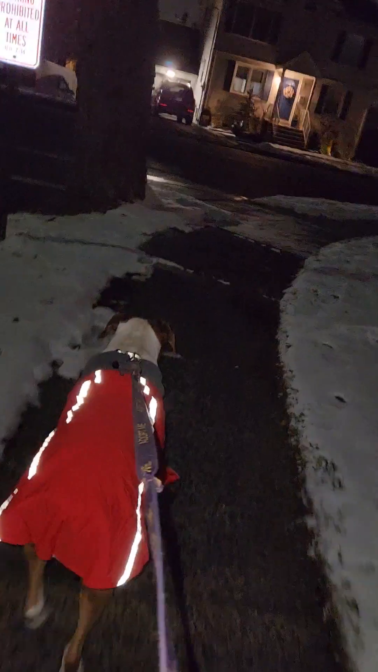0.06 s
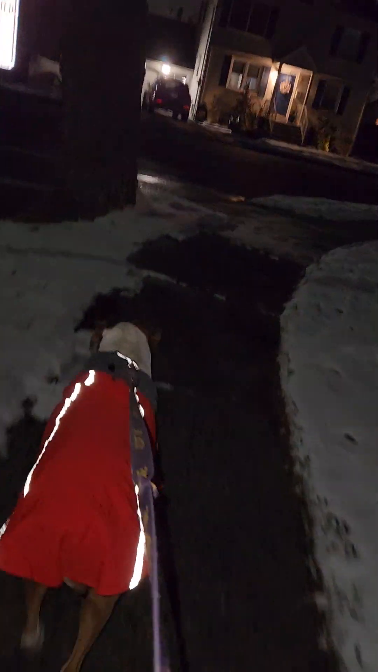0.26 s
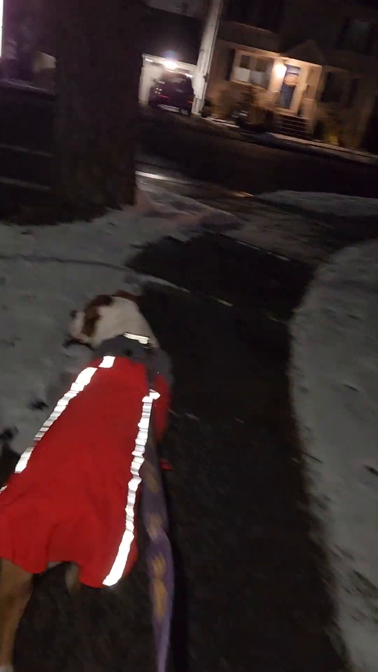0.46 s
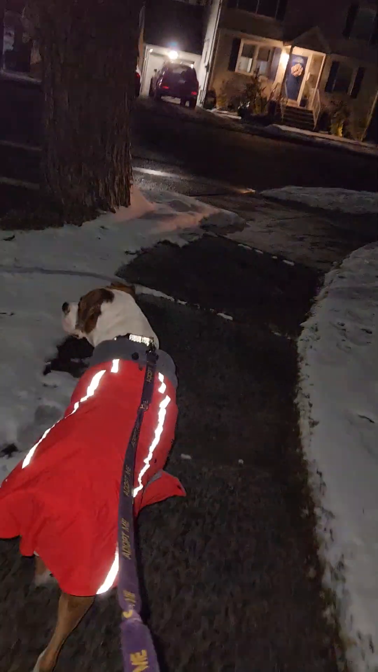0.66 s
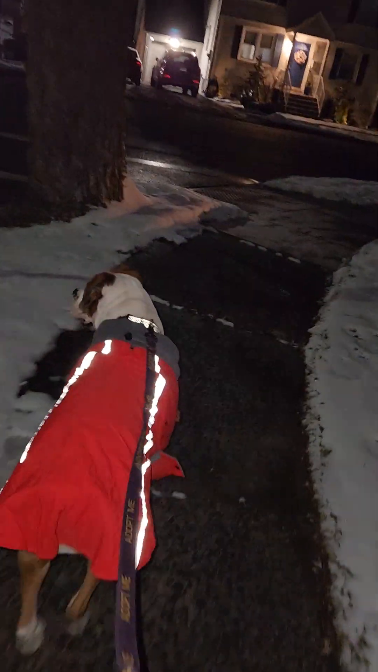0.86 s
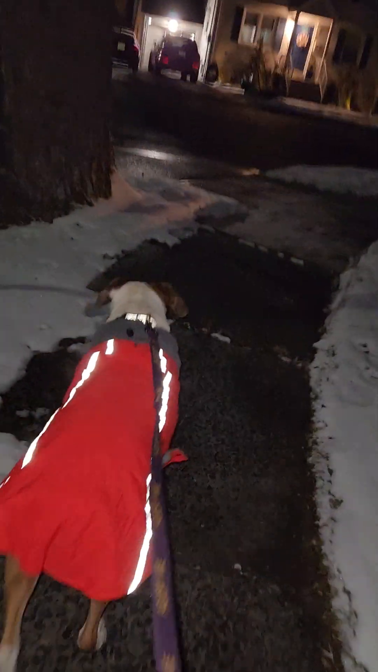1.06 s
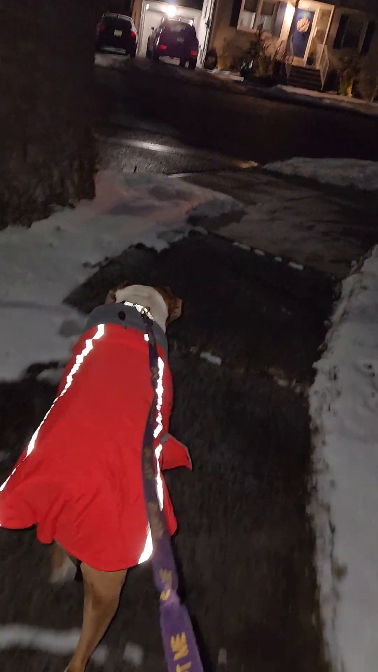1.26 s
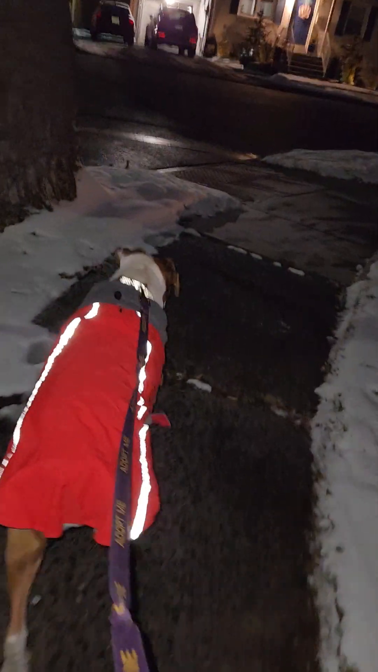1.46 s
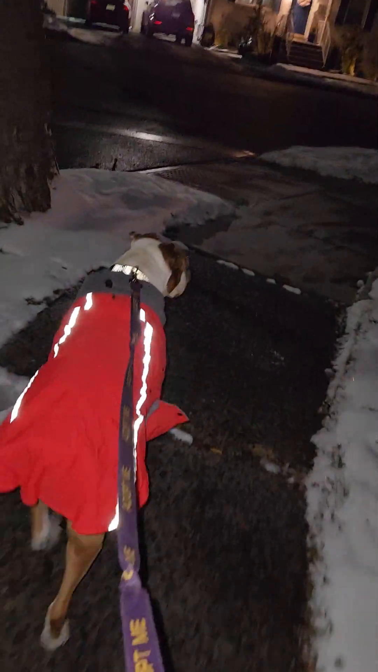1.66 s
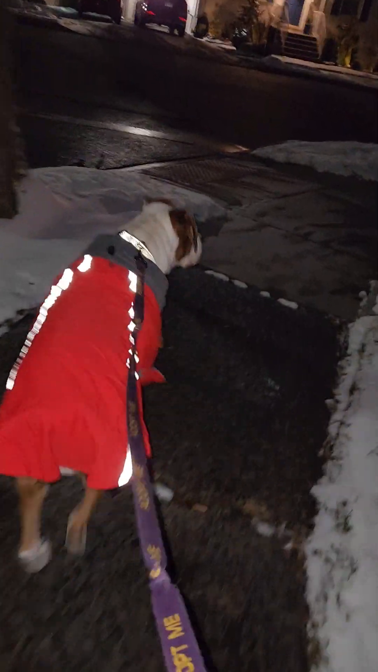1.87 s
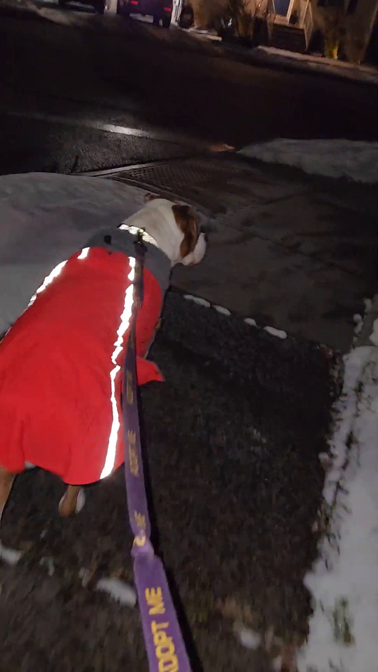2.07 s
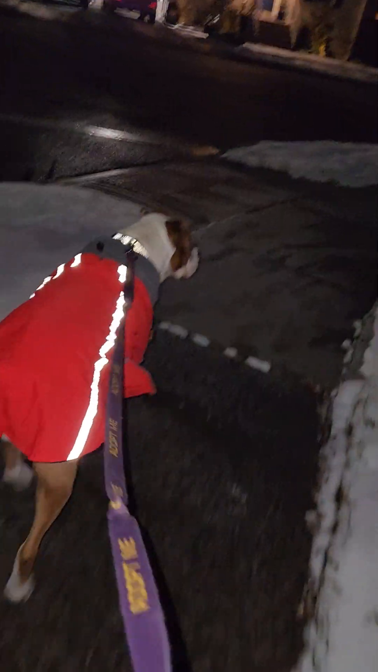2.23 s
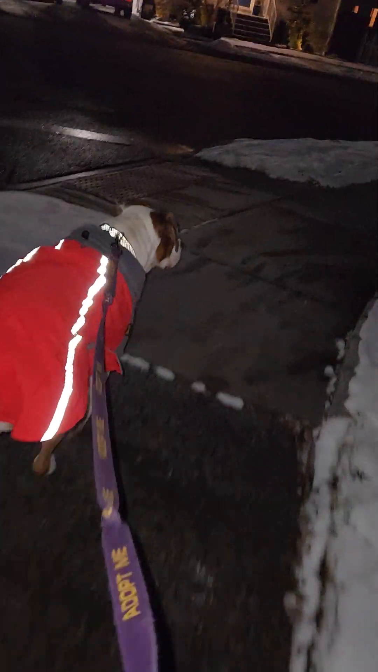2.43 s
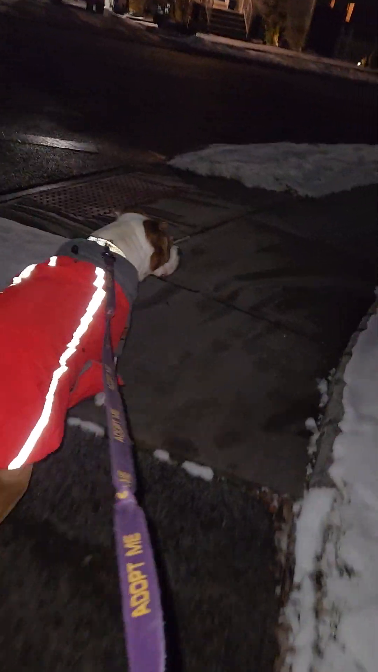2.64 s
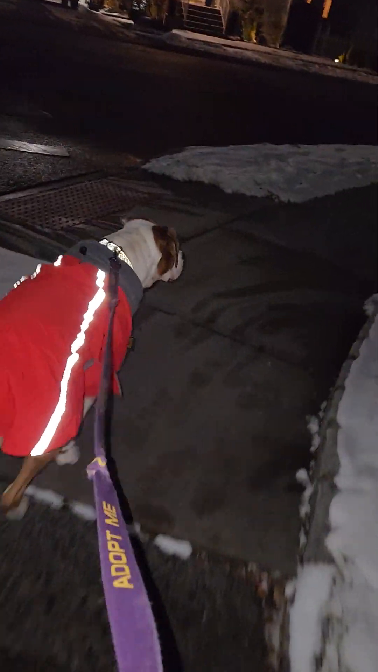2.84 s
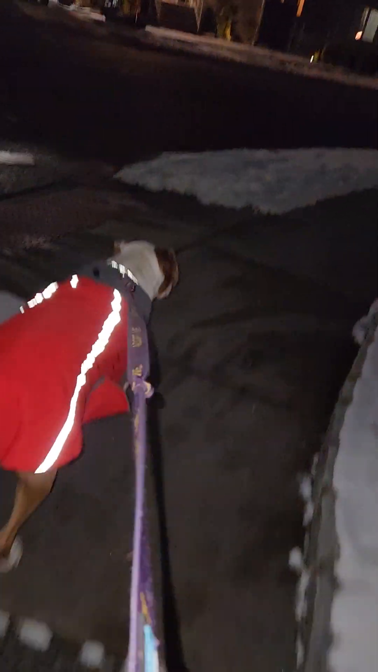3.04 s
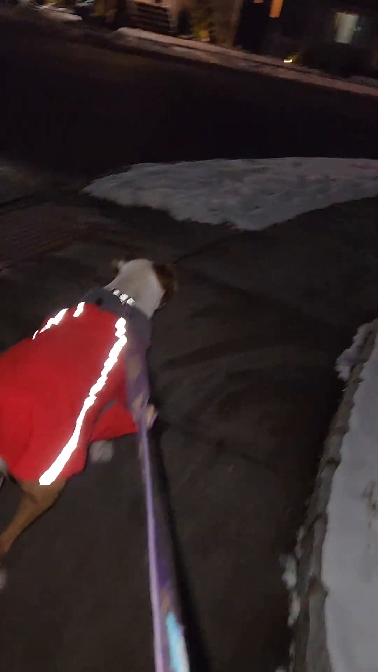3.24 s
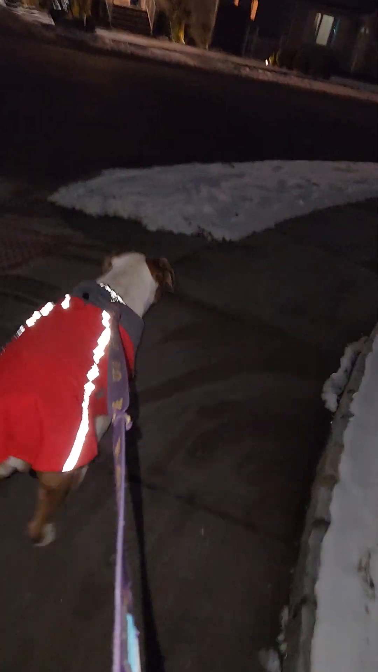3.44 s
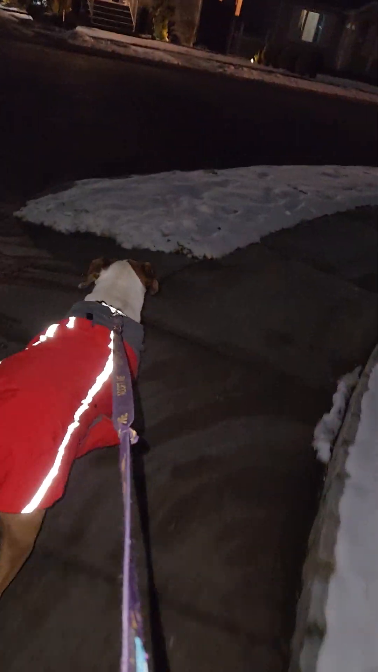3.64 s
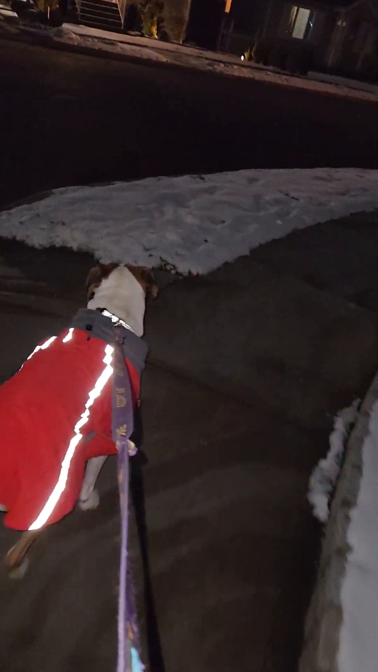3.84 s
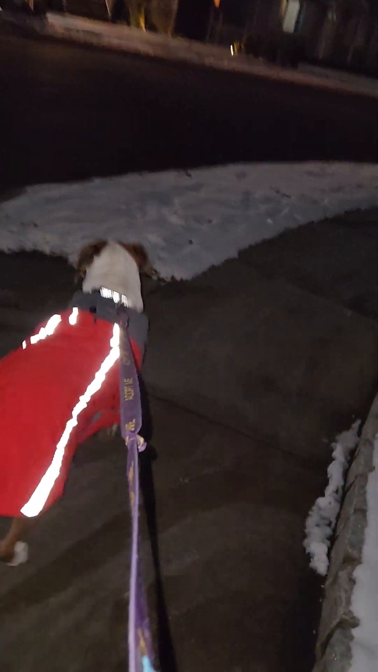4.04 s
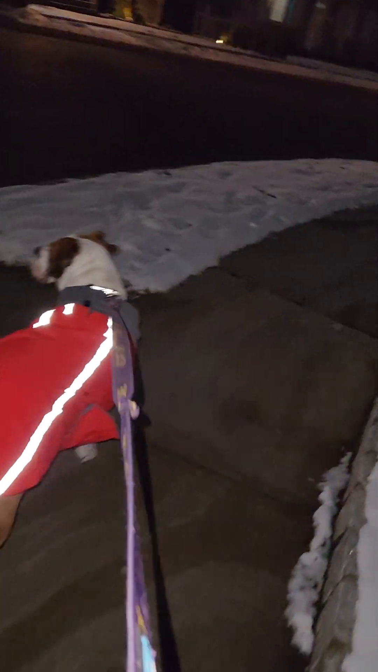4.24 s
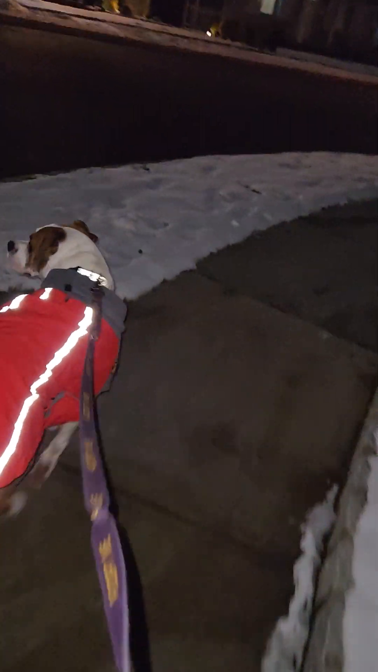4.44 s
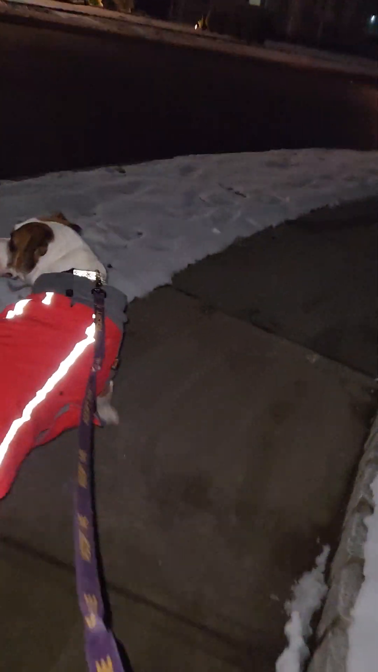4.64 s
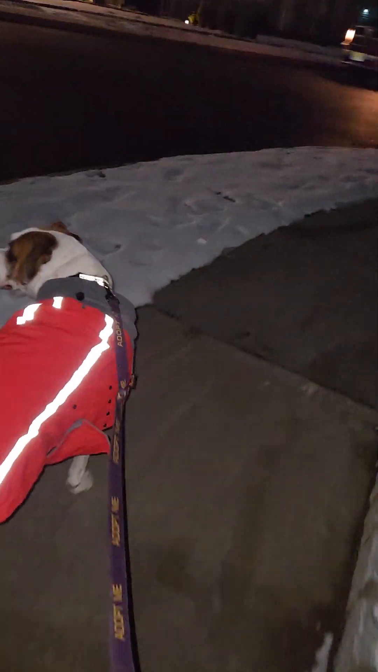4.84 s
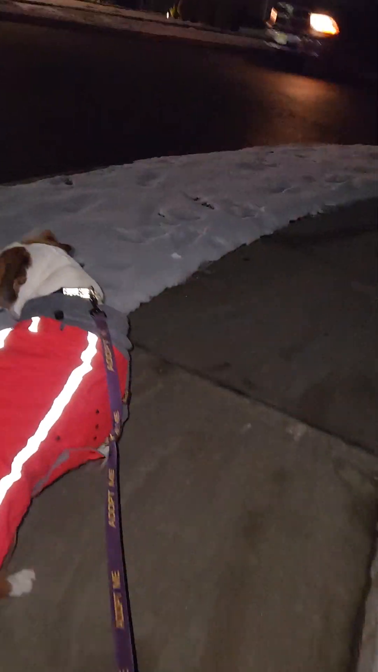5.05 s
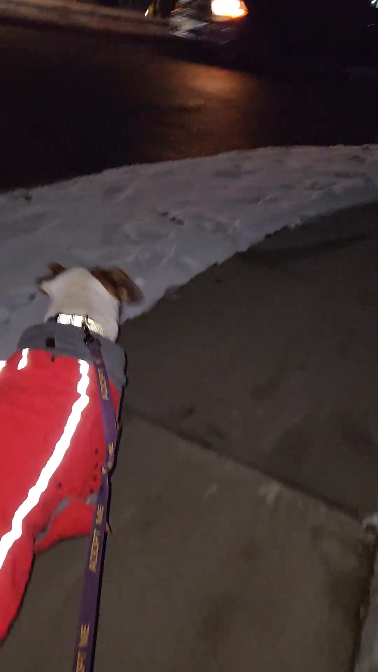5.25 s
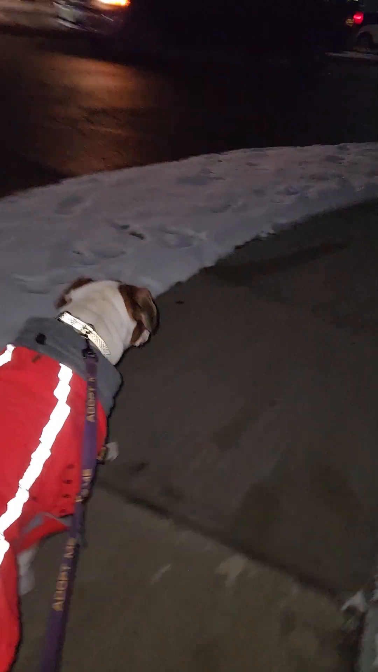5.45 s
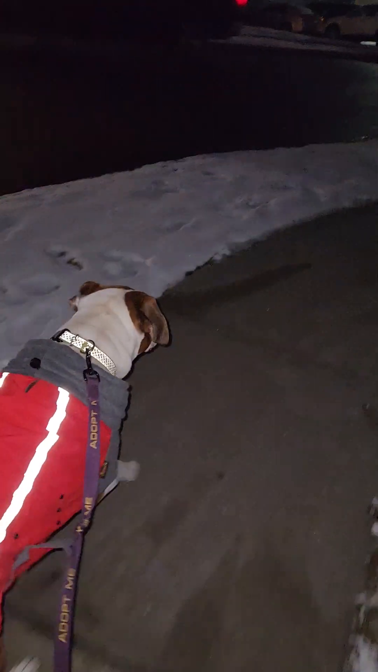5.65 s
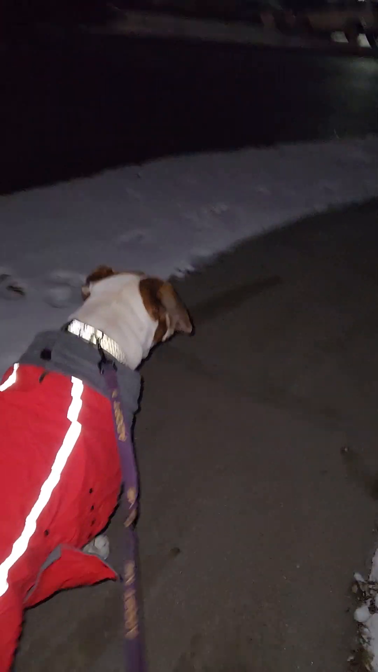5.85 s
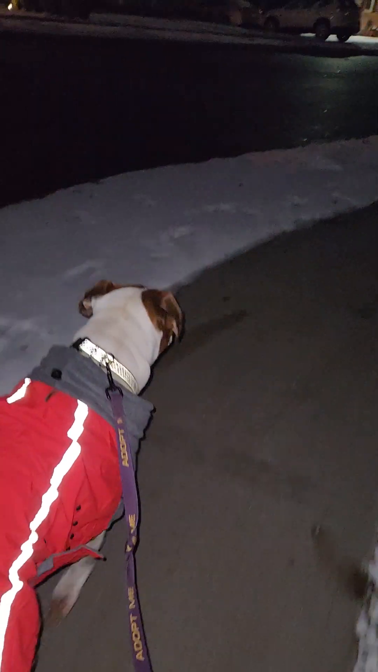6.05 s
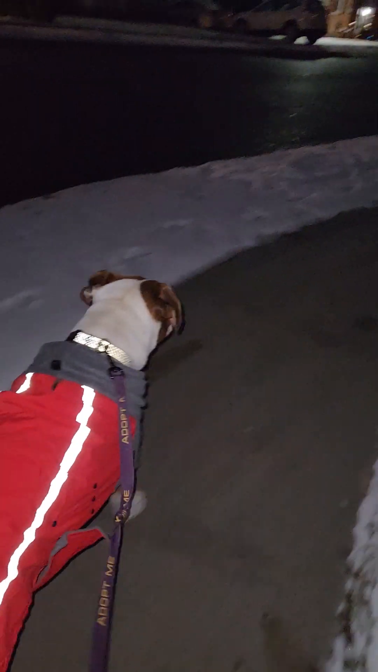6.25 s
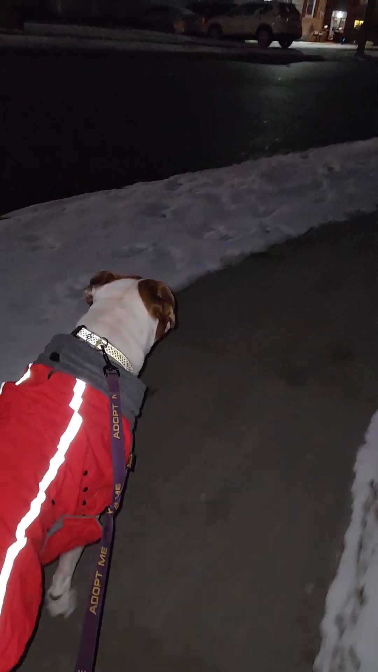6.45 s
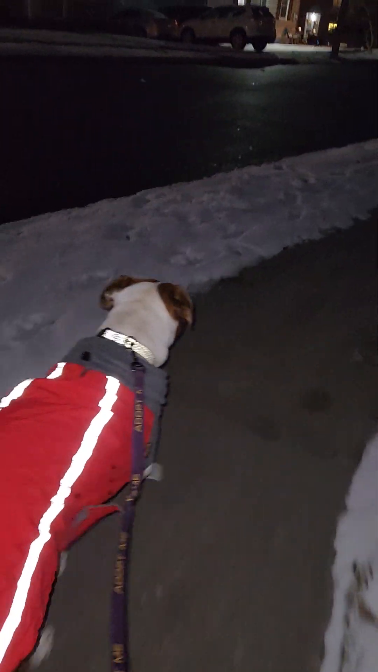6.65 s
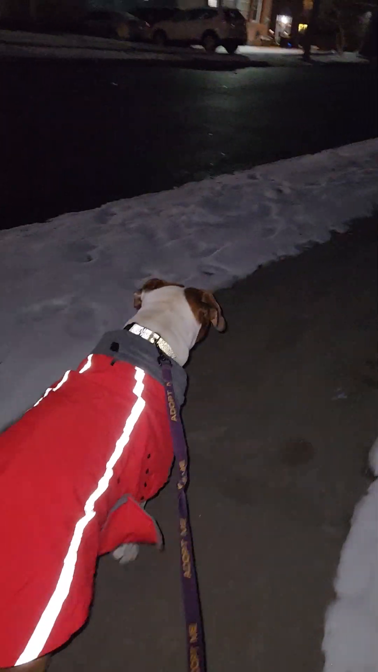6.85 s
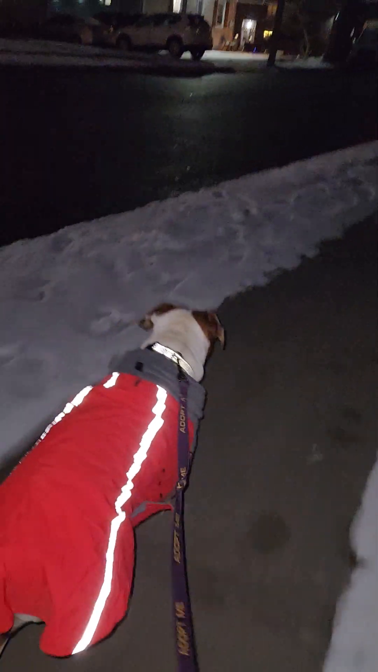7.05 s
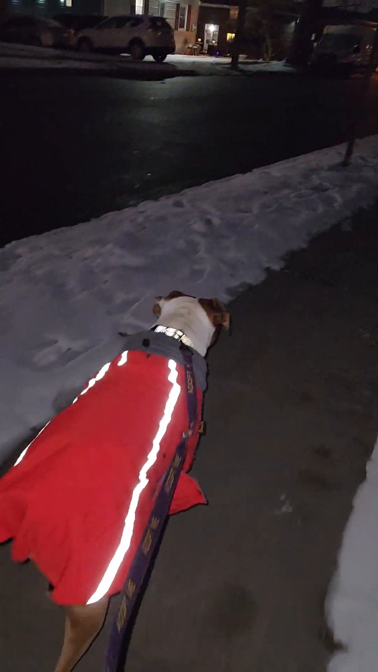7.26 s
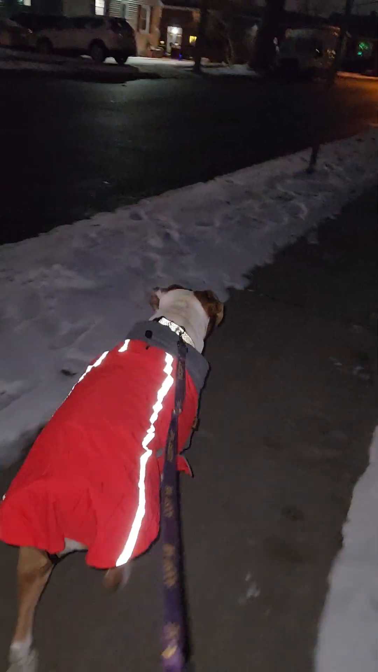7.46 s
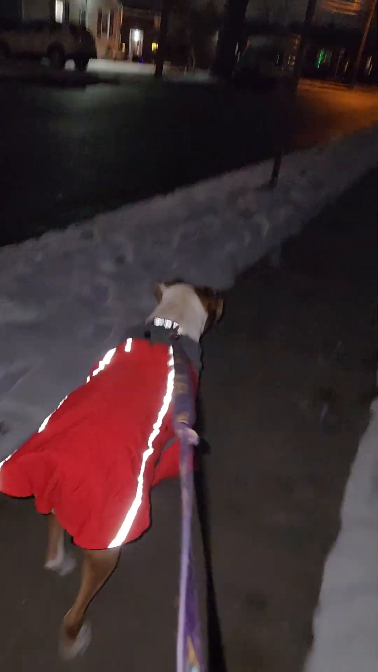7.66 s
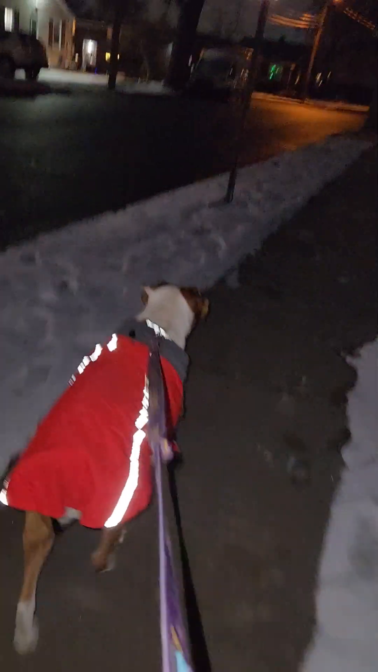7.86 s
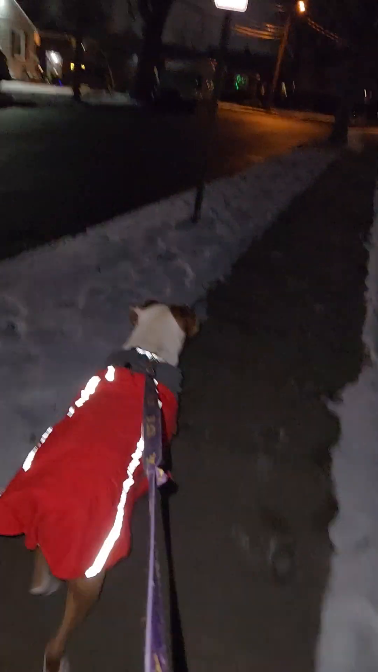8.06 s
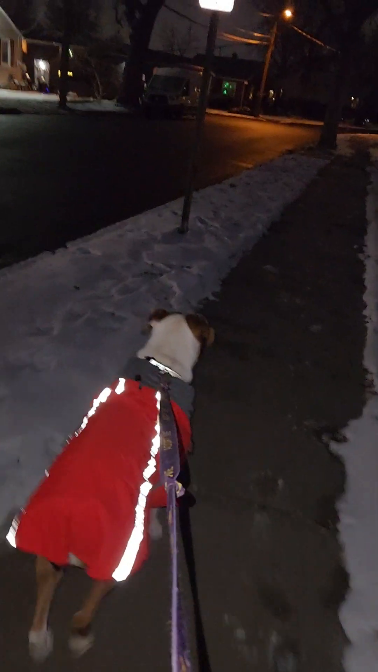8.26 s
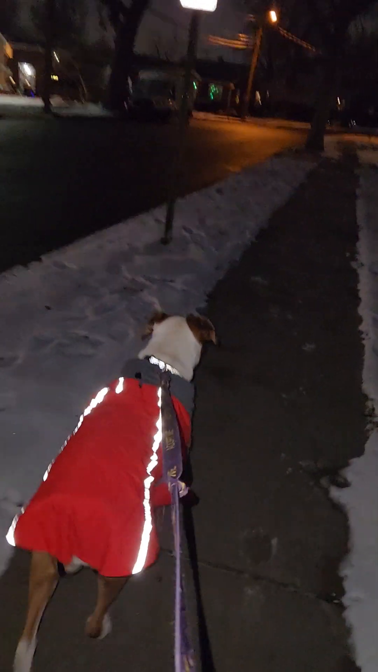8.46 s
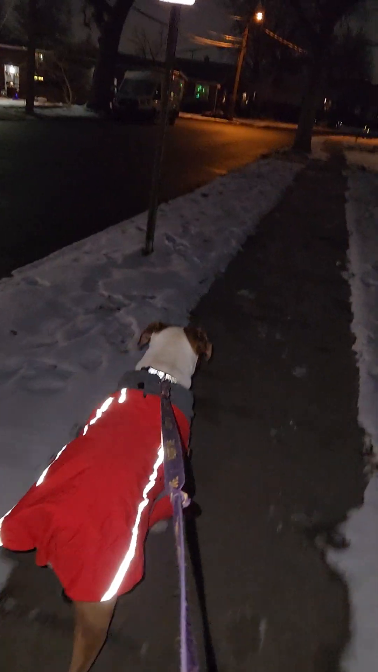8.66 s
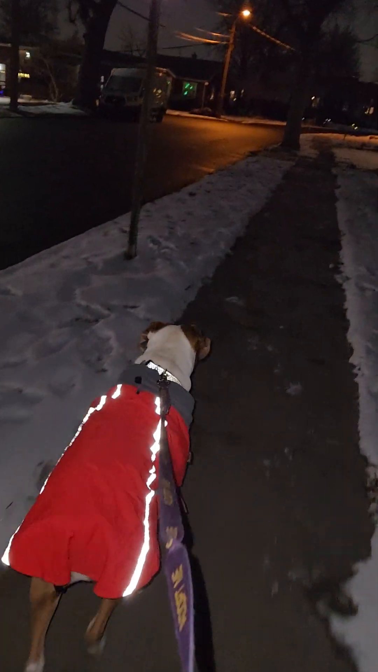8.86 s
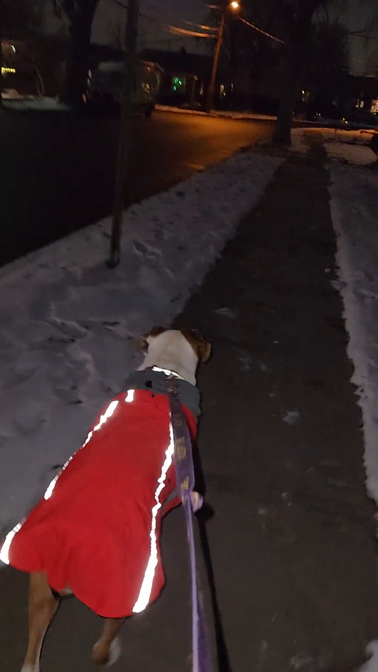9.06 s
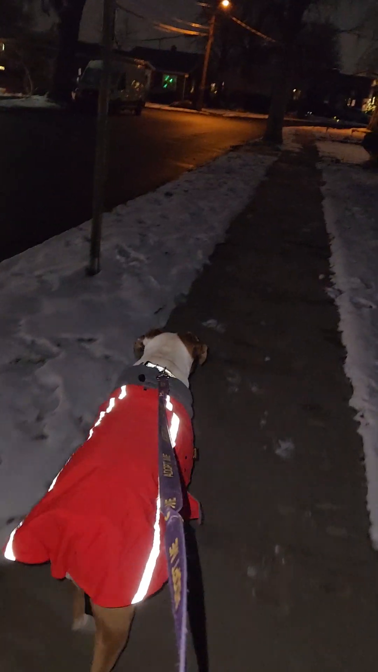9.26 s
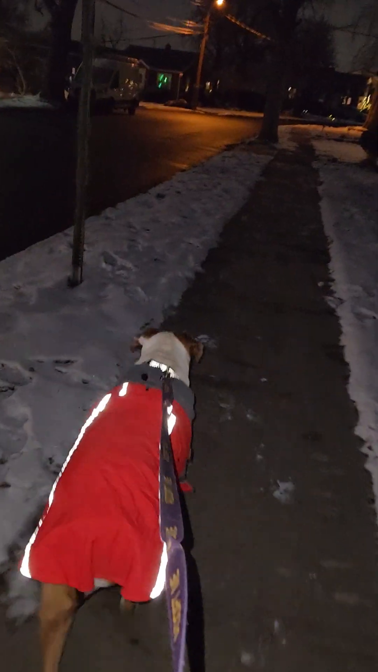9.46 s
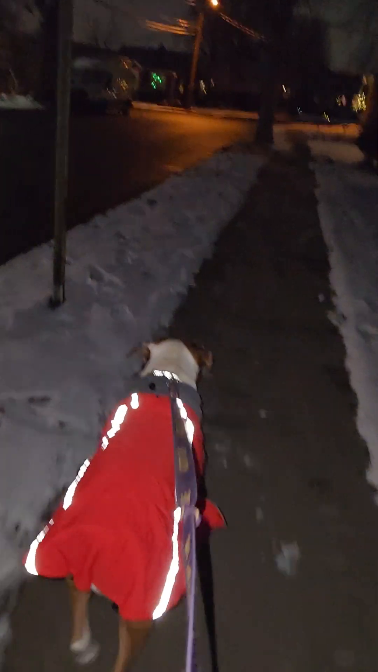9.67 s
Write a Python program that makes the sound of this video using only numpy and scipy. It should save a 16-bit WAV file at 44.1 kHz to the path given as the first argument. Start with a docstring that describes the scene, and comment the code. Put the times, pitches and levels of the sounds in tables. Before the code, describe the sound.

Low town hum and soft wind buffeting surround someone walking a dog. Fabric rustles close on the left, leash hardware clicks and grit crunches. An engine approaches with a deep, wavering boom, rises, shifts lower, and passes around the middle with rasping exhaust and hissing wet tyres. It recedes, hoots briefly and slows at the end.

```python
"""From the first seconds, walkers with a dog move along a night street: cloth rustles, leash hardware ticks, grit crunches.
A V8 vehicle winds up through town noise, drops in pitch near 3 s and cruises, summed from lines at engine orders.
It is closest near 5.4 s: the exhaust burbles and rasps, and tyres hiss on the wet road as coloured noise.
From 8.8 s the deep boom sinks, the pipe hoots briefly near 9.1 s and the engine slows to the end."""
import sys
import numpy as np
from scipy import signal
from scipy.fft import rfft, irfft, next_fast_len
from scipy.io import wavfile

SR = 44100
rng = np.random.default_rng(int(sys.argv[2]) if len(sys.argv) > 2 else 0)


def pcm_store(signal):
    """Save signal as 16-bit PCM."""
    levels = np.round(np.clip(np.atleast_2d(signal), -1, 1) * 32767)
    wavfile.write(sys.argv[1], SR, levels.astype(np.int16).T)


N = 427851
TIME = np.arange(N) / SR


def gain_of(db):
    """Decibels to amplitude."""
    return 10 ** (np.asarray(db) / 20)


def evened(x):
    """Scales to rms 1."""
    return x / np.sqrt(np.mean(x ** 2) + 1e-20)


def curves(rows):
    """Draws each column after the time column as an automation curve, one value per sample."""
    s, *columns = np.transpose(rows)
    return [np.interp(TIME, s, c) for c in columns]


def read(points, hz):
    """Reads a spectrum, joined by straight lines over log frequency."""
    f, value = np.transpose(points)
    return np.interp(np.log(hz + 1), np.log(f + 1), value)


def add(mix, s, sound):
    """Mixes a stereo sound in at time s."""
    part = mix[:, max(round(s * SR), 0):][:, :sound.shape[-1]]
    part += sound[..., :part.shape[-1]]


def wander(rate, size=4096):
    """Smooth random modulation of rms 1, rolled off above rate [Hz]."""
    hz = np.fft.rfftfreq(size, TIME[-1] / size)
    slow = irfft(rfft(rng.standard_normal(size)) / (1 + (hz / rate) ** 4))
    return np.interp(TIME, np.linspace(0, TIME[-1], size), evened(slow))


# how alike the two channels are: (frequency [Hz], coherence [0-1])
CHANNEL_COHERENCE = [(30, 0.52), (200, 0.99), (500, 0.85), (1000, 0.81), (2000, 0.33), (4000, 0.17),
                     (8000, .1), (12000, .02)]


def noise(spectrum, grain_db=0):
    """Stereo noise of rms 1, its channels most alike in the low mids; grain_db makes it crackle."""
    size = next_fast_len(N)
    hz = np.fft.rfftfreq(size, 1 / SR)
    # every 32 samples draw a new random level
    grain_level = np.minimum(rng.exponential(1, size // 32 + 1), 5)
    grains = gain_of(grain_db * grain_level).repeat(32)[:size]
    a, b = rfft(rng.standard_normal((2, size)) * grains)
    same = np.clip(read(CHANNEL_COHERENCE, hz), 0, 1)
    pair = np.array([a, same * a + np.sqrt(1 - same ** 2) * b])
    return evened(irfft(pair * gain_of(read(spectrum, hz)), size)[:, :N])


def band(x, hz, octaves):
    """A gentle band-pass around hz."""
    edges = np.clip([hz / 2 ** (octaves / 2), hz * 2 ** (octaves / 2)], 20, SR / 2 - 200)
    return signal.sosfilt(signal.butter(2, edges, "band", fs=SR, output="sos"), x)


def panned(x, balance_db):
    """Splits a left-right level difference between the channels."""
    return x * gain_of(np.array([[.5], [-.5]]) * balance_db)


# colour of the distant town: (frequency [Hz], level [dB per Hz])
STREET_COLOUR = [(20, -16.5), (45, -1.5), (85, 7.5), (150, 6.5), (300, -11.5), (500, -17.5), (850, -15),
                 (1400, -17), (2700, -30), (5000, -31), (6200, -54.5), (7500, -31), (10000, -61),
                 (15500, -58)]
# air on the microphone: (time [s], level before gusts [dB])
BUFFET_LEVEL = [(0, -48.5), (2.7, -36), (3.3, -29.5), (4.6, -41.5), (7.4, -46.5), (8.8, -32.5),
                (9.7, -34.5)]
# colour of the buffeting: (frequency [Hz], level [dB per Hz])
BUFFET_COLOUR = [(10, -14), (25, -5), (46, 0), (60, -2), (110, -18), (300, -50), (900, -90)]


def street(hum_db=-41, buffet_db=0.0, gust_db=5.5):
    """Distant town noise holds steady; air buffets the microphone as low noise with gusty level."""
    gusts_db = gust_db * wander(rate=4)
    buffet_gain = gain_of(curves(BUFFET_LEVEL)[0] + buffet_db + gusts_db)
    return gain_of(hum_db) * noise(STREET_COLOUR) + buffet_gain * noise(BUFFET_COLOUR)


# steady rustle of walking: (time [s], level before trim [dB])
RUSTLE_LEVEL = [(0, -74), (3.2, -68), (5.2, -61.5), (6.6, -60.5), (7.1, -69.5), (8.2, -76), (9.7, -73)]
# single rubs of cloth: (start [s], length [s], level before trim [dB], left-right difference [dB])
CLOTH_RUBS = [(.37, 0.18, -55, 0), (1.3, 0.37, -62, 3), (1.876, 0.11, -58, 4), (2.373, 0.14, -58.5, 3),
              (2.82, 0.35, -68, 7), (3.354, 0.39, -56, 4), (3.86, 0.18, -58, 3), (4.34, 0.18, -57.5, 0),
              (4.796, 0.13, -52.5, 4), (4.94, .14, -59, 11), (5.267, 0.2, -59, 15), (5.732, 0.1, -39.5, -1),
              (5.917, 0.055, -58, 8), (6.133, 0.41, -62, 12), (6.79, 0.087, -61, 8), (7.35, 1, -66.5, 6),
              (9.27, 0.17, -59, -2)]
# colour of the fabric: (frequency [Hz], level [dB per Hz])
CLOTH_COLOUR = [(400, -21.5), (1500, -0.5), (2400, 9.5), (4000, 2.5), (7600, 1), (10000, -7), (11200, -6.5),
                (12500, -2), (14000, -5), (15800, -1)]
RUB_RISE, RUB_HOLD = 0.2, 0.43  # shares of a rub's length at which it is full and starts to die


def cloth(rustle_db=5.5, rub_db=7.0, uneven_db=3.0, catch_db=2.5):
    """Fabric rustles unevenly on the left; each rub swells, catches as it slides and dies away."""
    rustle_level = curves(RUSTLE_LEVEL)[0] + rustle_db + uneven_db * wander(rate=8.1)
    rustle = panned(gain_of(rustle_level), balance_db=14.0)
    rubs = np.zeros((2, N))
    for s, length, db, balance_db in CLOTH_RUBS:
        shape = np.interp(np.linspace(0, 1, round(length * SR)), [0, RUB_RISE, RUB_HOLD, 1], [0, 1, 1, 0])
        add(rubs, s, panned(gain_of(db + rub_db) * shape, balance_db))
    catching = rubs * gain_of(catch_db * wander(rate=52))
    return np.hypot(rustle, catching) * noise(CLOTH_COLOUR, grain_db=1.5)


def burst(hz, octaves, t60, snap=6, size=6000):
    """A sharp snap and a dying puff of noise in one band, peak 1."""
    t = np.arange(size) / SR
    common, left, right = rng.standard_normal((3, size))
    drive = (common + .5 * np.array([left, right])) * gain_of(-60 * t / t60) + snap * (t == 0)
    puff = band(drive, hz, octaves)
    return puff / abs(puff).max()


# leash hardware: (time [s], peak before panning [dB], centre [Hz], width [octaves], t60 [s],
# left-right difference [dB])
LEASH_TICKS = [(0.36, -41, 7300, 1.1, .03, -10), (.469, -36, 7000, 1.1, .02, -6),
               (1.305, -40, 6650, .6, .03, 8), (1.577, -38, 9000, 1.5, .012, 15),
               (1.791, -45, 7000, 0.48, .017, 6), (2.581, -36, 9500, 1.3, .02, 9),
               (3.959, -38, 7300, 1.3, .025, 3), (4.094, -41, 5970, .6, .02, 7),
               (4.352, -31, 12100, 0.034, .025, -7), (8.053, -38, 3300, 0.43, 0.028, 7),
               (8.37, -45, 6860, .66, 0.13, -6), (9.487, -38, 4700, 1, .038, 6)]
# grit and ice under shoes and paws: (time [s], peak [dB], centre [Hz])
GRIT_CRUNCHES = [(.937, -32.5, 1600), (1.226, -32.5, 1700), (1.415, -34, 1900), (1.721, -31.5, 1500),
                 (1.924, -34, 1500), (3.891, -30, 1200), (3.96, -31, 2000), (4.424, -29.5, 1300),
                 (4.897, -27, 1700), (6.740, -26, 1050)]
# soft knocks of steps and handling: (time [s], level [dB], base pitch [Hz], t60 [s])
STEP_KNOCKS = [(.876, -16, 125, .045), (3.427, -26, 320, .06), (3.96, -29, 420, .03),
               (5.835, -13.5, 385, .035), (6.404, -22, 420, .03), (9.3, -27, 130, .09)]
# what a knock rings with: (multiple of its base pitch [ratio], level [dB])
KNOCK_RING = [(1, -3), (1.5, -4), (1.95, -5), (2.5, -6)]


def walking(tick_db=0, size=6000):
    """Metal ticks and grit are short noise bursts; a knock is dying sine modes under a dull puff."""
    out, t = np.zeros((2, N)), np.arange(size) / SR
    for s, db, hz, octaves, t60, balance_db in LEASH_TICKS:
        add(out, s, gain_of(db + tick_db) * panned(burst(hz, octaves, t60), balance_db))
    for s, db, hz in GRIT_CRUNCHES:
        add(out, s, gain_of(db) * burst(hz, octaves=1.6, t60=.04, snap=3))
    for s, db, hz, t60 in STEP_KNOCKS:
        ring = sum(gain_of(mode_db) * np.sin(2 * np.pi * hz * ratio * t) for ratio, mode_db in KNOCK_RING)
        attack = np.minimum(t * hz, 1)
        add(out, s, gain_of(db - 60 * t / t60) * ring * attack)
        # the blow itself is a broad, dull puff
        add(out, s, gain_of(db - 5) * burst(1.8 * hz, octaves=1.8, t60=t60, snap=14))
    return out


# faint squeaks of the wheels: (time [s], peak [dB], middle pitch [Hz])
WHEEL_SQUEAKS = [(2.54, -76, 8900), (2.89, -68, 8900), (3.24, -77, 8950), (3.56, -59, 8900),
                 (3.9, -60, 8850), (4.22, -66, 8870), (4.54, -63, 8880), (5.14, -60, 8830),
                 (5.71, -65, 8900), (5.98, -60, 8650), (6.82, -57, 8380)]


def squeaks(length=0.049, fall=.015):
    """Short, thin sine chirps that sag in pitch."""
    out, t = np.zeros((2, N)), np.arange(0, length, 1 / SR)
    for s, db, hz in WHEEL_SQUEAKS:
        turns = np.cumsum(hz * (1 + fall * (.5 - t / length))) / SR
        add(out, s, gain_of(db) * np.hanning(len(t)) * np.sin(2 * np.pi * turns))
    return out


# strength of the tyre horn: (time [s], level before trim [dB])
HORN_LEVEL = [(0, -25), (3.8, -9.5), (4.8, 1.5), (5.3, -5), (5.9, 4), (6.15, 3), (6.5, -11.5), (9.7, -29.5)]
# colour of the tyre horn: (frequency [Hz], level [dB per Hz])
HORN_COLOUR = [(1200, -40), (1800, -12), (2100, 1.5), (2450, -2), (2900, -0.5), (3300, -14.5), (5000, -42)]


def tread(whine_db=-49.0):
    """The wedge between tyre and road acts as a horn: a hissing band, strongest around the pass."""
    beam_db, = curves(HORN_LEVEL)
    return panned(gain_of(whine_db + beam_db) * noise(HORN_COLOUR, grain_db=2.5), balance_db=4.5)


# tyres on the wet road: (time [s], roar level before trim [dB], spray level before trim [dB])
TYRE_LEVELS = [(0.0, -52, -59.5), (1.24, -52.5, -59), (4.38, -44, -56), (5.02, -41.5, -53),
               (6.56, -42, -53), (6.97, -40.5, -49.5), (7.32, -44, -51), (8.13, -46.5, -61.5),
               (9.29, -53.5, -63.5), (9.7, -53, -60.5)]
# tread roar heard ahead of and behind the vehicle: (frequency [Hz], level [dB per Hz])
ROAR_FRONT = [(410, -23), (700, -3), (831, -2.5), (884, -3.5), (1040, -0.5), (1180, -2), (1460, -4.5),
              (1660, -15), (2020, -9.5), (2420, -15.5), (2700, -15), (3600, -23.5), (4680, -47.5),
              (7920, -120)]
ROAR_BACK = [(410, -24.5), (700, 1), (797, 2), (933, -6), (1000, -3.5), (1210, -11.5), (1480, -10),
             (1740, -16.5), (2040, -11), (3250, -24.5), (3600, -28), (4680, -65), (7920, -120)]
# flung water heard ahead of and behind the vehicle: (frequency [Hz], level [dB per Hz])
SPRAY_FRONT = [(1880, -23.5), (3200, -3), (3970, -7.5), (4260, -7.5), (5060, -12), (5460, -6.5),
               (5890, -12), (6180, -9), (6830, -13.5), (7480, -10), (10000, -25.5), (13000, -55),
               (22000, -120)]
SPRAY_BACK = [(1880, -20), (3200, -9.5), (3820, -6), (4240, -4), (5540, -9.5), (5920, -12), (7440, -13),
              (8960, -24), (10000, -27), (13000, -55), (22000, -120)]


def tyres(behind, balance_db, roar_db=4.0, spray_db=1.5, flicker_db=1.13):
    """Tread roar and flung water, each with one colour ahead of the vehicle and another behind it."""
    roar_level, spray_level = curves(TYRE_LEVELS)
    front, back = np.sqrt(1 - behind ** 2), behind
    roar = front * noise(ROAR_FRONT, grain_db=2.5) + back * noise(ROAR_BACK, grain_db=1.0)
    spray = front * noise(SPRAY_FRONT, grain_db=1.5) + back * noise(SPRAY_BACK, grain_db=2.0)
    roar = panned(gain_of(roar_level + roar_db) * roar, 0.66 * balance_db)
    spray = panned(gain_of(spray_level + spray_db) * spray, 1.52 * balance_db)
    return (roar + spray) * gain_of(flicker_db * wander(rate=22))


# how hard the engine pulls: (time [s], level before trim [dB])
ENGINE_LOAD = [(0, -32), (1.9, -29), (2.5, -21), (3.3, -22), (5, -26), (6.2, -31), (9.2, -33), (9.7, -42)]
# colour of the rumble: (frequency [Hz], level [dB per Hz])
RUMBLE_COLOUR = [(30, -36.5), (65, -14.5), (105, -4.0), (150, -2.5), (210, -4), (270, -19.5), (420, -42.5),
                 (900, -74)]


def engine_rumble(rumble_db=-9):
    """Uneven combustion fills the valleys between the low lines with noise while the engine pulls."""
    load_db, = curves(ENGINE_LOAD)
    return gain_of(load_db + rumble_db) * noise(RUMBLE_COLOUR)


def firing_phase(order):
    """Phase of an order: one bank fires in slots 0, 2, 3, 5 of eight, the other more weakly."""
    strength = np.array([1, .4, 1, 1, .4, 1, .4, .4])
    slots = np.arange(len(strength)) / len(strength)
    smear = 2.2 * np.sqrt(order) - np.pi  # the muffler smears each pulse
    return np.angle(np.sum(strength * np.exp(-2j * np.pi * order * slots))) - smear


# upper exhaust note, which also guides the gas: (time [s], burble before trim [dB], rasp before trim [dB])
EXHAUST_LEVELS = [(0.1, -37.5, -50.5), (2.08, -34, -46.5), (2.45, -29, -40.5), (3.17, -31, -42),
                  (3.47, -26.5, -40.5), (3.66, -32.5, -43.5), (3.89, -26, -40.5), (4.97, -22, -33.5),
                  (5.47, -25, -37), (6.46, -20.5, -28), (7.02, -25.5, -28.5), (7.77, -28, -38),
                  (8.39, -28, -39), (9.16, -31, -41.5), (9.24, -33, -47), (9.7, -53, -56)]
# colour of the escaping gas: (frequency [Hz], level [dB per Hz])
GAS_COLOUR = [(150, -38.5), (280, 0), (390, -1.5), (470, -7), (800, -10.5), (1100, -24.5), (1450, -13.5),
              (1800, -21), (3000, -28.5), (6000, -74.5)]
GAS_DB, GAS_FAR_DB = -7.5, 7.5  # gas noise against the rasp, and how much more of it is heard from afar


def gas(angle, far, depth=0.063):
    """Turbulent gas leaves the pipe in puffs, at the firing rate and the beat of the stronger bank."""
    puffs = np.cos(8 * angle) + np.cos(3 * angle + firing_phase(3))
    level = gain_of(curves(EXHAUST_LEVELS)[1] + GAS_DB + GAS_FAR_DB * far)
    return level * evened(np.exp(depth * puffs)) * noise(GAS_COLOUR)


CLOSEST_S, PASS_WIDTH_S = 5.42, 1.8
ECHO_HZ, ECHO_DB = 296, 6  # the road's echo when the vehicle is closest
ECHO_REACH = 1.73  # beyond this many times the closest distance the echo stops changing
HOOT_S, HOOT_LENGTH_S, HOOT_HZ, HOOT_DB = 9.12, 0.12, 362, 10  # as the throttle shuts the pipe hoots
PEAK_OCTAVES = 0.12  # half width of both peaks


def line_lift(hz):
    """Lift [dB] of a line by the road's echo, higher and stronger from afar, and by the lift-off hoot."""
    t, hz = TIME[::SR // 100], hz[::SR // 100]
    # in units of the closest distance
    distance = np.minimum(np.hypot(1, (t - CLOSEST_S) / PASS_WIDTH_S), ECHO_REACH)
    hoot_db = HOOT_DB * np.exp(-((t - HOOT_S) / HOOT_LENGTH_S) ** 2)
    peaks = (ECHO_HZ * distance, ECHO_DB * distance), (HOOT_HZ, hoot_db)
    return [np.interp(TIME, t, db / (1 + (np.log2(hz / centre) / PEAK_OCTAVES) ** 2)) for centre, db in peaks]


# uneven firing puts a line on every multiple of the cycle, its strength repeating every 8 orders:
# one column (level [dB]), rows are 0 to 4 orders from a multiple of 8
FIRING_PATTERN = [1.5, -2, -2.5, 2.5, -4.5]
# colour of the exhaust pipe heard from ahead and from behind: (frequency [Hz], level [dB])
PIPE_FRONT = [(55, -16.5), (140, -7.5), (162, -16), (181, -4.5), (220, -11.5), (250, -22), (300, -18.5),
              (345, -29), (395, -17), (450, -39), (600, -26.5), (830, -34)]
PIPE_BACK = [(55, -16), (95, -4.5), (140, -7.5), (170, -16), (195, -8), (228, -12), (250, -20),
             (292, -14.5), (320, -30), (378, -10.5), (430, -34.5), (460, -18.5), (488, -29), (520, -23),
             (590, -23.5), (830, -30.5)]
CRUISE_HZ = 13.9  # cycle rate at which the pipe colour is read


def exhaust(angle, speed, behind, far, waver_db=2.37, far_db=-5, burble_db=0.62, rasp_db=0.06, uneven_db=1.0):
    """Engine orders sound as firing pattern times pipe colour: burble up to order 24, rasp above it."""
    stacks, powers = np.zeros((2, N)), np.zeros((2, N))
    for k in [4, 6, 7, *range(9, 61)]:
        upper = int(k > 24)
        pattern_db = FIRING_PATTERN[min(k % 8, -k % 8)]
        front_db, back_db = read(PIPE_FRONT, k * CRUISE_HZ), read(PIPE_BACK, k * CRUISE_HZ)
        pipe_db = (1 - behind) * front_db + behind * back_db
        echo_db, hoot_db = line_lift(k * speed)
        # echoes off the houses: each line drifts at random in level and phase
        height = gain_of(pattern_db + pipe_db + echo_db + waver_db * wander(rate=1.07))
        powers[upper] += height ** 2
        # far away, the higher lines sink into the street noise
        height = height * gain_of(hoot_db + far_db * far * np.clip(k / 8 - 1.6, 0, 1.6))
        echo_phase = 1.1 * rng.standard_normal() + .1 * wander(rate=3)  # radians
        stacks[upper] += height * np.cos(k * angle + firing_phase(k) + echo_phase)
    # the strength of the firings flickers
    burble, rasp = stacks / np.sqrt(powers) * gain_of(uneven_db * wander(rate=40))
    burble_level, rasp_level = curves(EXHAUST_LEVELS)
    return np.sqrt(2) * (gain_of(burble_level + burble_db) * burble + gain_of(rasp_level + rasp_db) * rasp)


# deep boom, order 5, swelling and fading among the houses: (time [s], level before trim [dB])
BOOM_LEVEL = [(0.0, -24.5), (0.59, -21), (0.81, -29.5), (1.75, -21.5), (1.86, -25.5), (2.03, -16.5),
              (2.27, -18), (2.35, -28.5), (2.78, -15.5), (2.89, -24), (2.97, -16.5), (3.13, -33),
              (3.19, -21), (3.83, -14.5), (4.27, -25.5), (4.48, -15.5), (5.16, -11), (5.62, -17.5),
              (5.78, -13), (5.94, -16.5), (7.92, -20), (8.64, -16), (9.7, -37.5)]
# firing note, order 8: (time [s], level before trim [dB])
FIRING_LEVEL = [(0.0, -19), (0.59, -31.5), (0.7, -20.5), (0.86, -35), (1.13, -18.5), (1.54, -28.5),
                (1.73, -22.5), (1.81, -31), (2.03, -22.5), (2.16, -35), (2.29, -18.5), (2.78, -16.5),
                (3.02, -23.5), (3.24, -17.5), (3.38, -29), (3.51, -15.5), (3.81, -38.5), (4.0, -21),
                (4.46, -17), (4.81, -41), (5.0, -23), (6.08, -16), (9.29, -26.5), (9.7, -57)]
LIFT_OFF_S, LIFT_OFF_FALL_S, LIFT_OFF_DB = 8.8, 0.14, 2.5  # off the throttle the deep boom sinks quickly


def boom(angle, deep_db=0, firing_db=-0.32, flutter_db=1.54):
    """The deep boom and the firing note, orders 5 and 8 as cosines, each fluttering a little in level."""
    sunk_db = LIFT_OFF_DB * np.clip((TIME - LIFT_OFF_S) / LIFT_OFF_FALL_S, 0, 1)
    deep_level = curves(BOOM_LEVEL)[0] + deep_db - sunk_db
    firing_level = curves(FIRING_LEVEL)[0] + firing_db
    lines = 0
    for k, db in [(5, deep_level), (8, firing_level)]:
        lines = lines + gain_of(db + flutter_db * wander(rate=4.4)) * np.cos(k * angle + firing_phase(k))
    return np.sqrt(2) * lines


# engine speed winding up, dropping at the gear change, cruising and lifting off:
# (time [s], four-stroke cycle rate [Hz])
ENGINE_SPEED = [(0, 12.9), (.3, 13.06), (.9, 13.9), (2.1, 15.42), (2.65, 16.28), (2.8, 15.65), (3.0, 14.16),
                (3.17, 13.07), (3.6, 13.13), (4.8, 13.7), (5.7, 13.97), (6.6, 13.91), (7.5, 13.82),
                (8.8, 14.08), (9.2, 13.28), (9.7, 13.0)]
# where the vehicle is: (time [s], view [0 front - 1 tailpipe], bearing [1 left, 0 straight on, below 0 right],
# tyre left-right difference before scaling [dB], farness [0-1])
VEHICLE_PATH = [(0, 0.52, 0.51, 1.5, 1), (1.2, 0.61, 0.62, 1.5, 0.14), (2.9, 0.031, 0.77, 3.5, 1),
                (3.7, 0.24, 0.73, 3, 0.04), (5.2, 0.2, 0.92, 3.5, 0.03), (6.1, 0.83, 0.66, 6, 0),
                (6.6, 0.97, 0.15, 0, 0), (7.4, 1, 0.092, 7, 0.04), (8.3, 0.7, -0.18, 0.5, 0.5),
                (9.7, 0.82, -0.44, 1.5, 0.4)]
# phase turn of the right channel, scaled by bearing: (frequency [Hz], phase at bearing 1 [rad])
RIGHT_CHANNEL_PHASE = [(20, .03), (70, 0.086), (200, 0.077), (380, 1), (600, 2.08), (1100, 4.17),
                       (2000, 3.95), (4000, 7)]


def vehicle():
    """One crank angle drives boom, exhaust and gas puffs; the rumble and the tyres are free noise."""
    behind, bearing, balance_db, far = curves(VEHICLE_PATH)
    behind = np.clip(behind, 0, 1)
    speed, = curves(ENGINE_SPEED)
    angle = 2 * np.pi * np.cumsum(speed) / SR + .005 * wander(rate=18)
    engine = panned(boom(angle) + exhaust(angle, speed, behind, far) + engine_rumble(), balance_db=0.84)
    engine = engine + panned(gas(angle, far), -1.5 * bearing)
    left, right = engine + tyres(behind, balance_db)
    # the phase of the right channel turns with frequency and bearing
    hz, t, z = signal.stft(right, SR, nperseg=2048, noverlap=1536)
    z = z * np.exp(-1j * np.outer(read(RIGHT_CHANNEL_PHASE, hz), np.interp(t, TIME, bearing)))
    return np.array([left, signal.istft(z, SR, nperseg=2048, noverlap=1536)[1][:N]])


def scene():
    """The street, the walkers and the passing vehicle."""
    return street() + cloth() + walking() + squeaks() + tread() + vehicle()


def record(dry):
    """A 4 ms fade-in and a steep low-pass at 15850 Hz."""
    faded = dry * np.minimum(TIME / .004, 1)
    return signal.oaconvolve(faded, signal.firwin(511, 15850, window=("kaiser", 9), fs=SR)[None], "same")


dry = scene()
out = record(dry)
pcm_store(out)
```